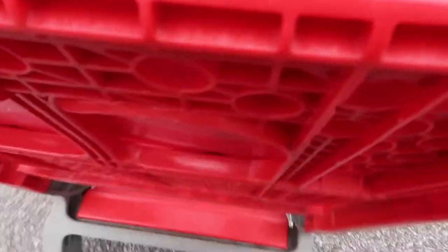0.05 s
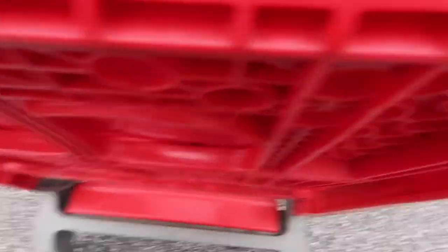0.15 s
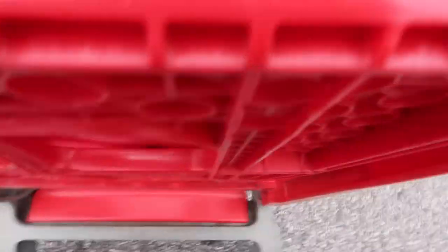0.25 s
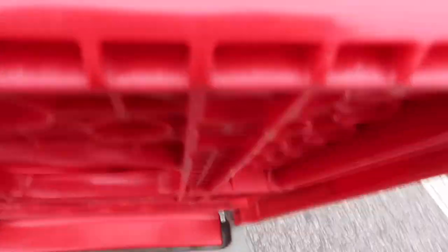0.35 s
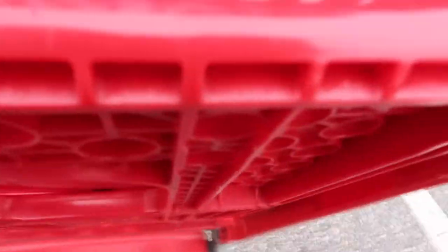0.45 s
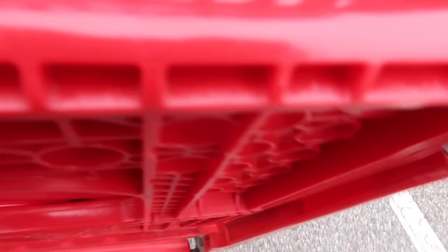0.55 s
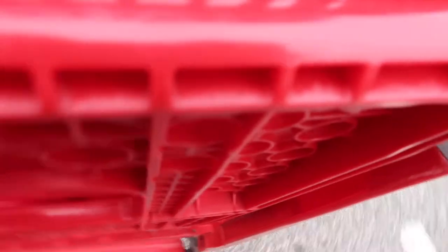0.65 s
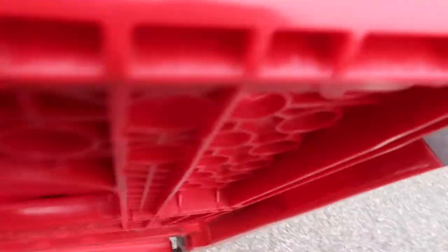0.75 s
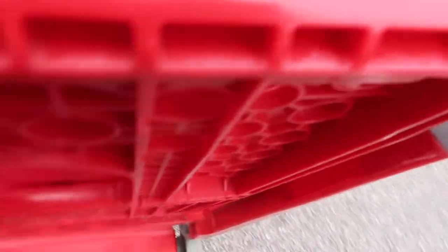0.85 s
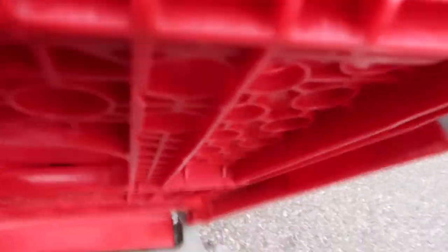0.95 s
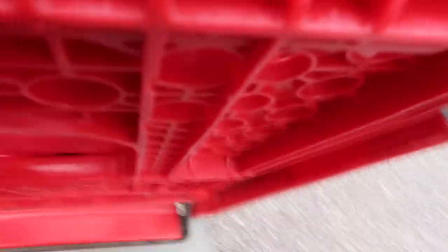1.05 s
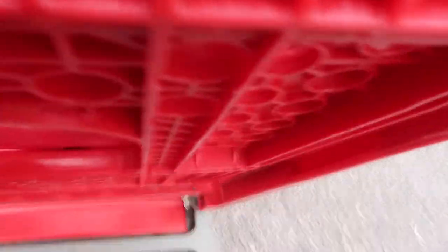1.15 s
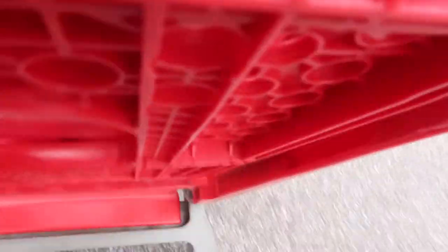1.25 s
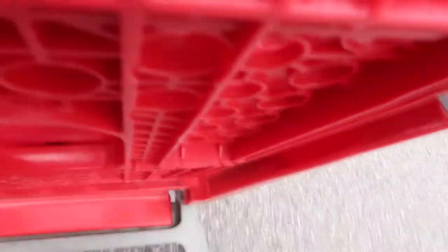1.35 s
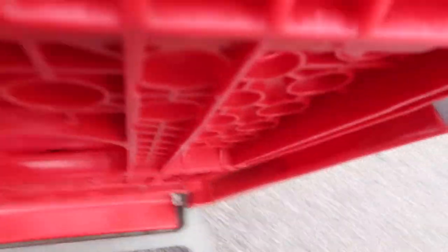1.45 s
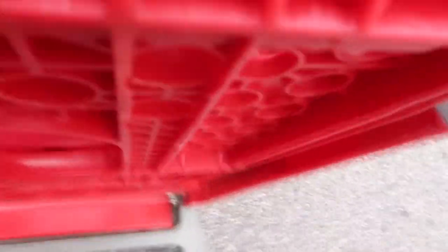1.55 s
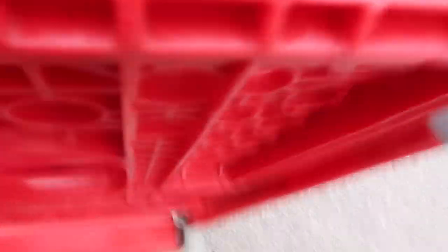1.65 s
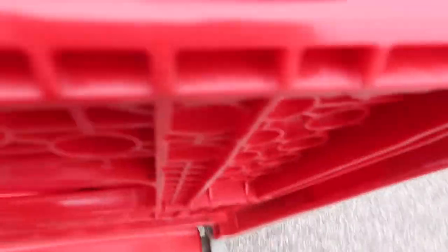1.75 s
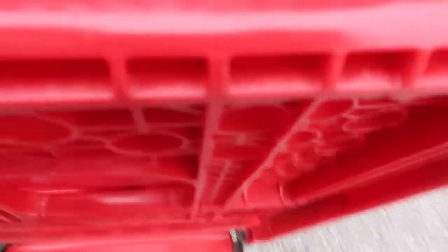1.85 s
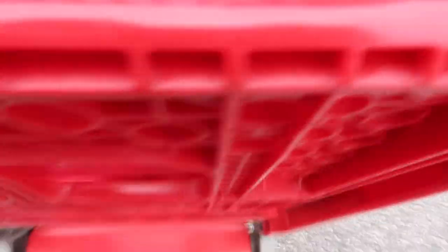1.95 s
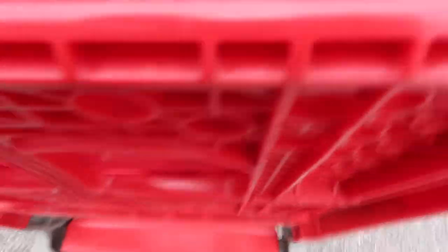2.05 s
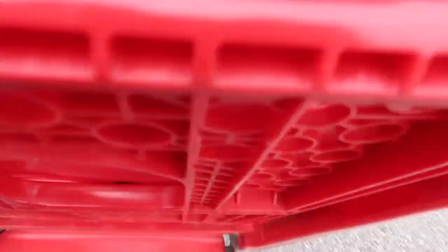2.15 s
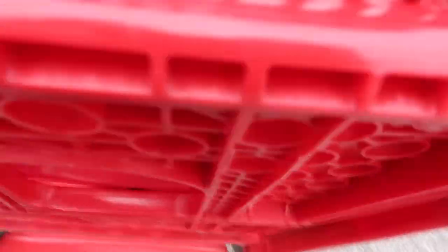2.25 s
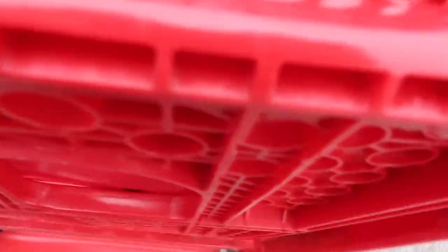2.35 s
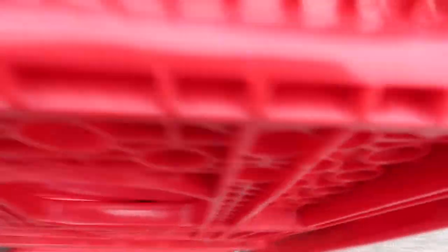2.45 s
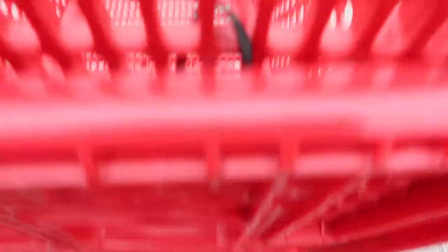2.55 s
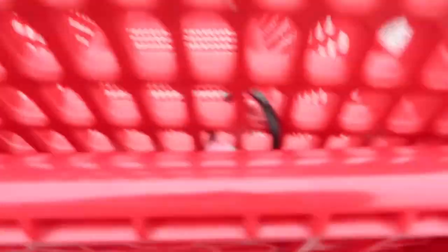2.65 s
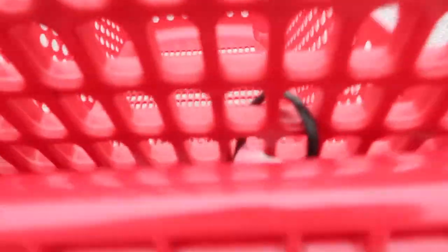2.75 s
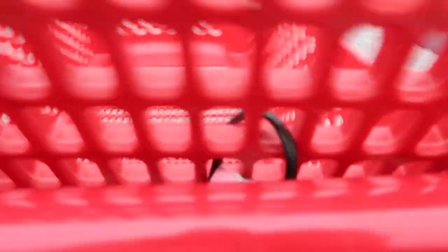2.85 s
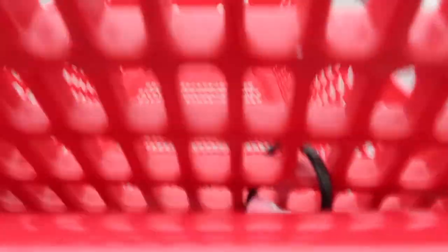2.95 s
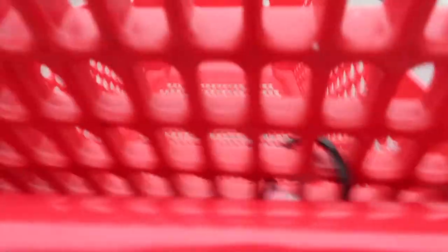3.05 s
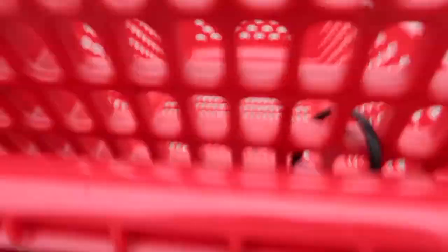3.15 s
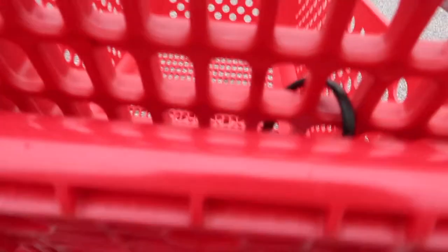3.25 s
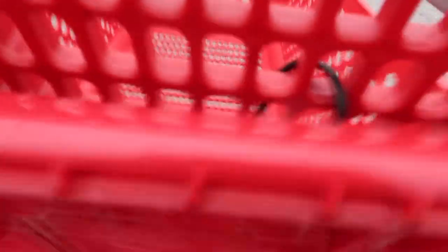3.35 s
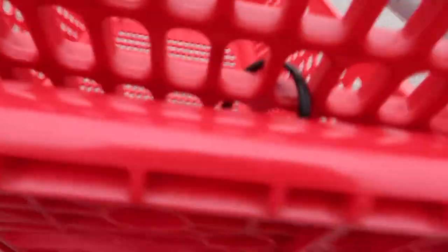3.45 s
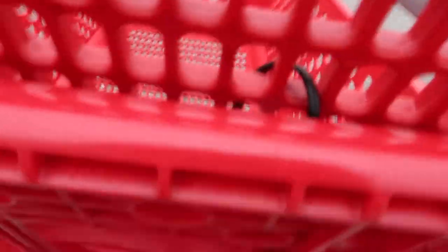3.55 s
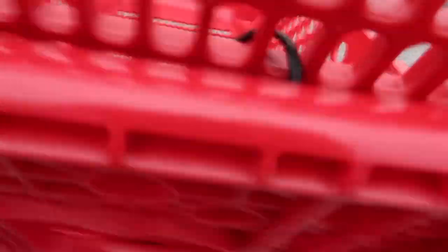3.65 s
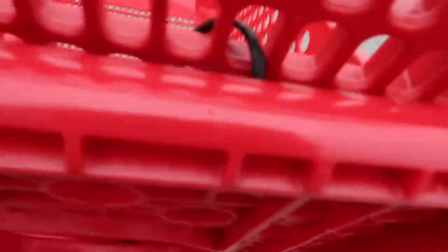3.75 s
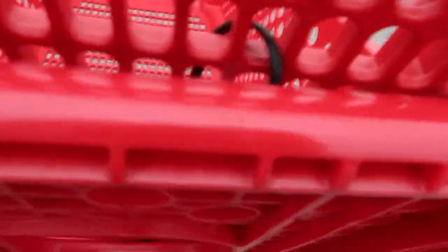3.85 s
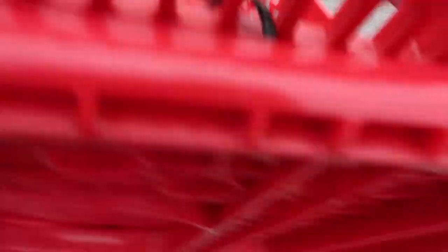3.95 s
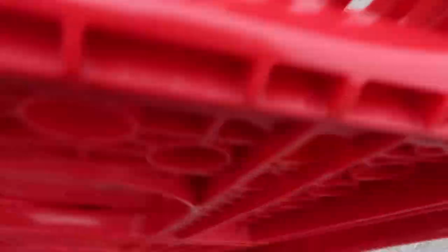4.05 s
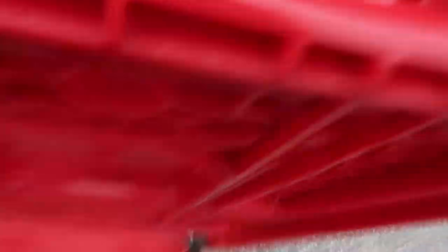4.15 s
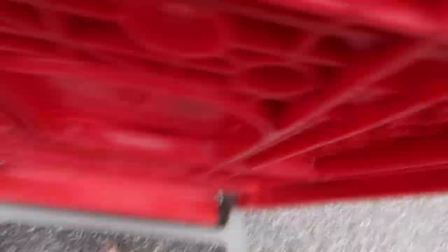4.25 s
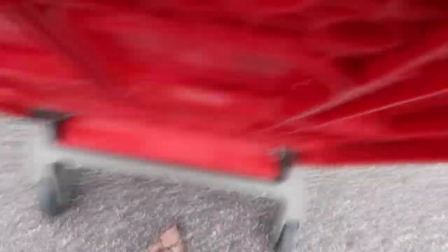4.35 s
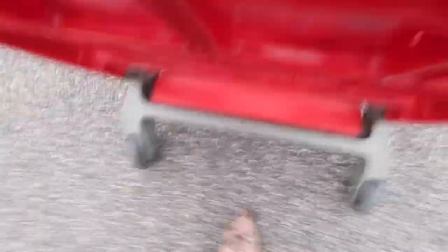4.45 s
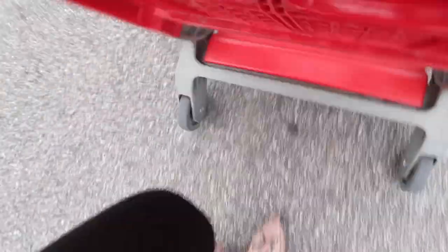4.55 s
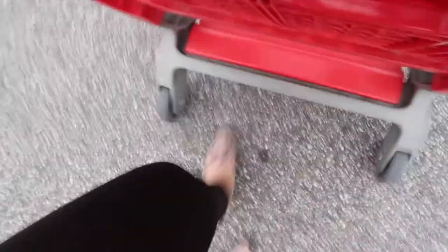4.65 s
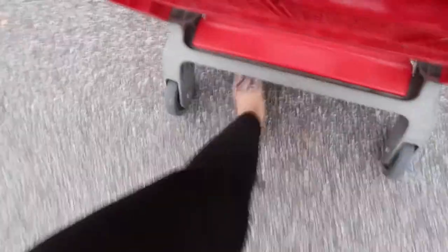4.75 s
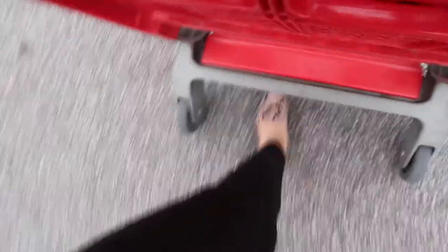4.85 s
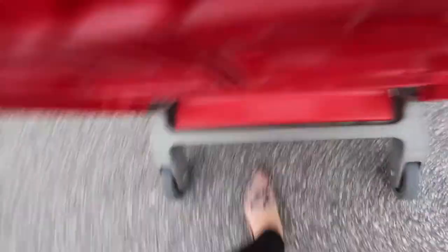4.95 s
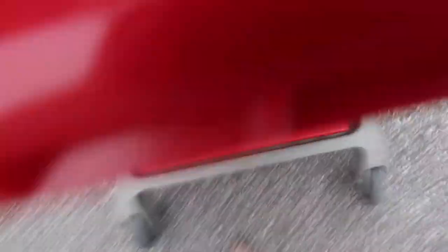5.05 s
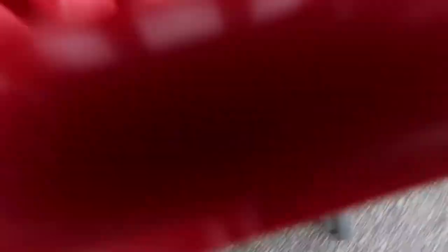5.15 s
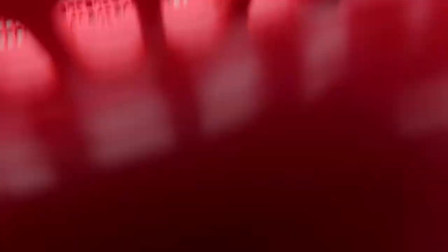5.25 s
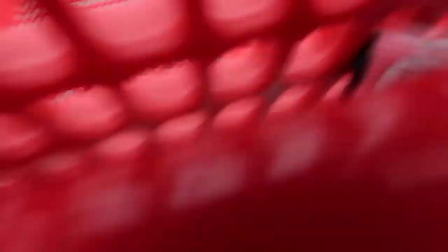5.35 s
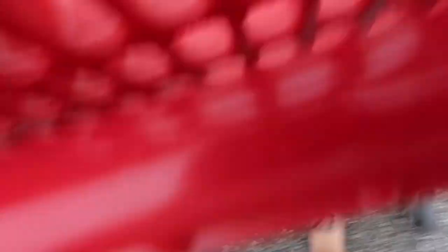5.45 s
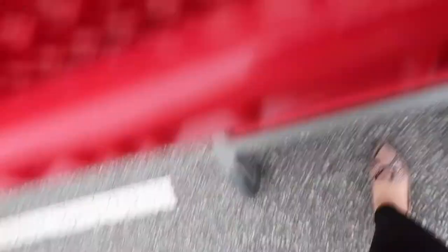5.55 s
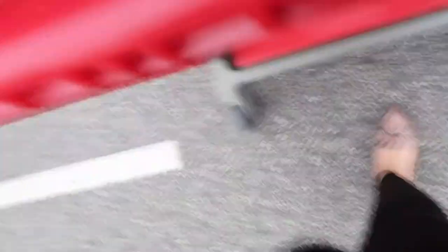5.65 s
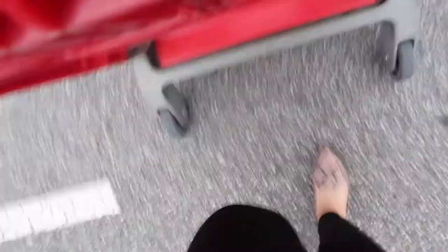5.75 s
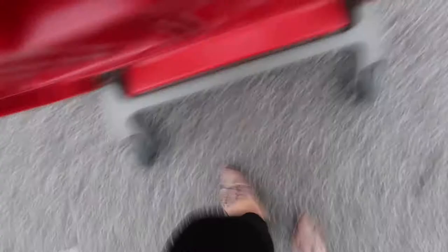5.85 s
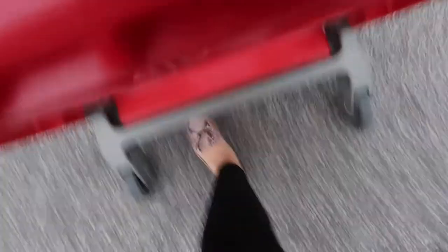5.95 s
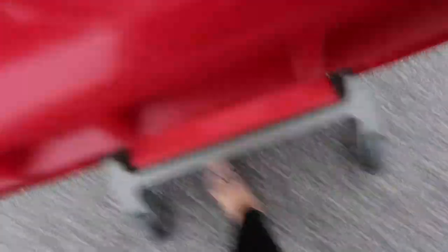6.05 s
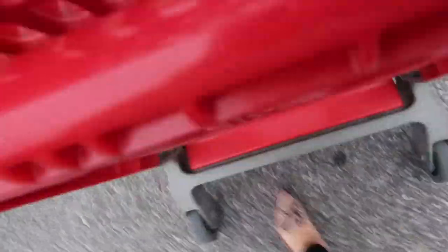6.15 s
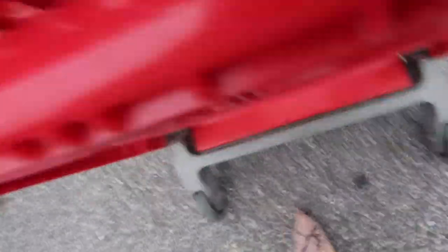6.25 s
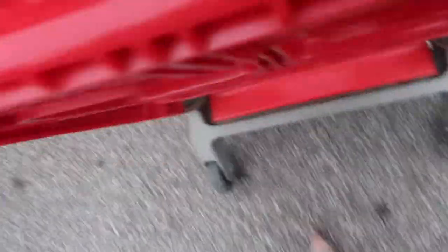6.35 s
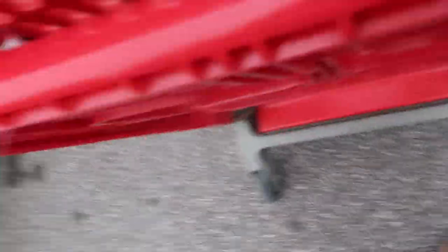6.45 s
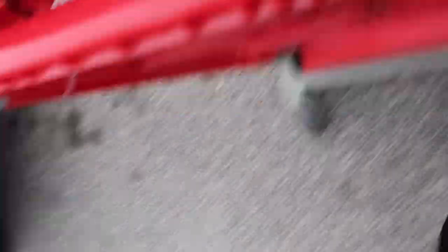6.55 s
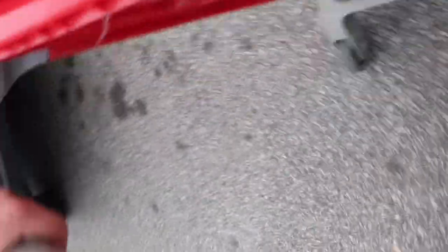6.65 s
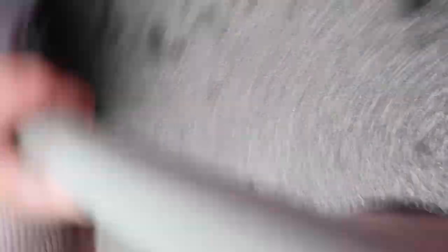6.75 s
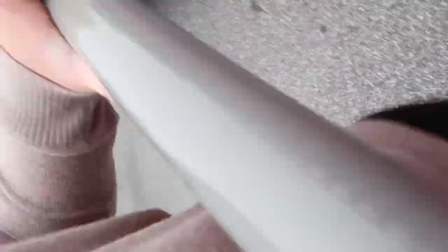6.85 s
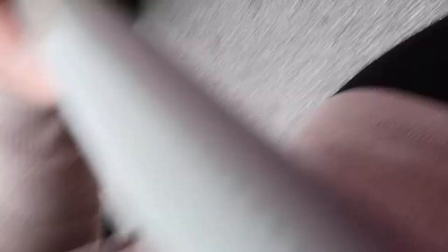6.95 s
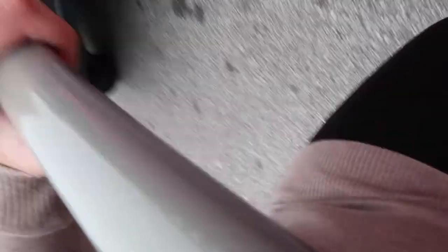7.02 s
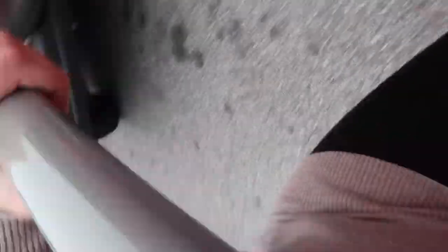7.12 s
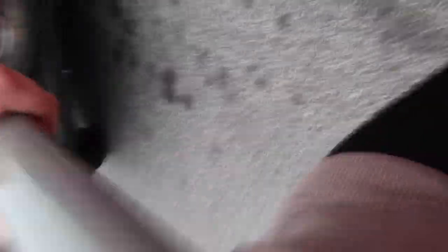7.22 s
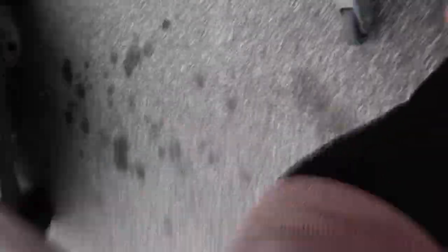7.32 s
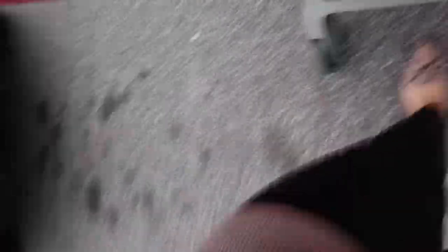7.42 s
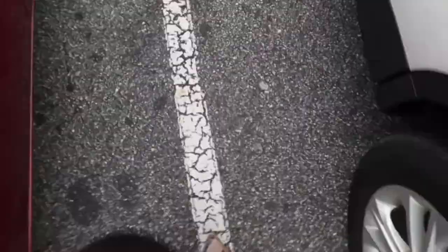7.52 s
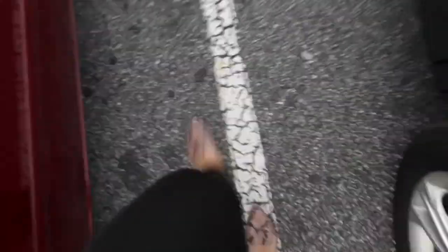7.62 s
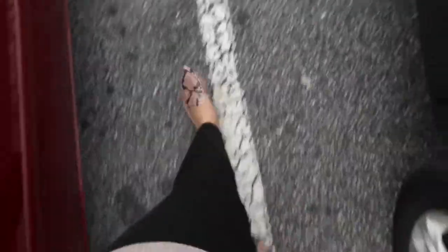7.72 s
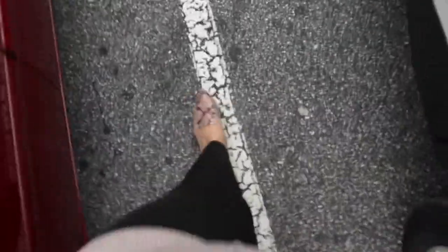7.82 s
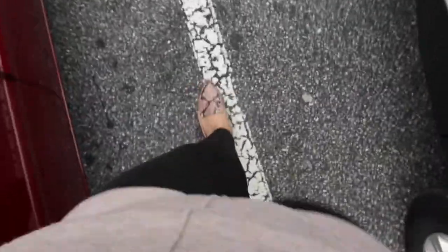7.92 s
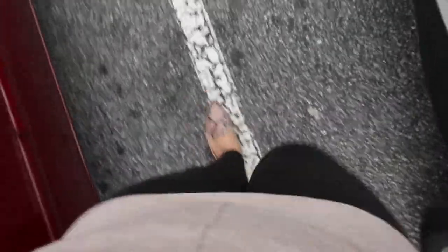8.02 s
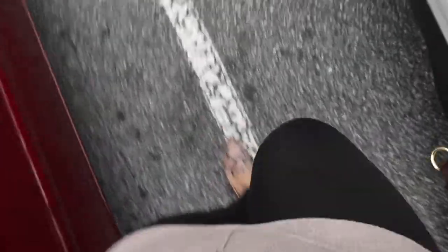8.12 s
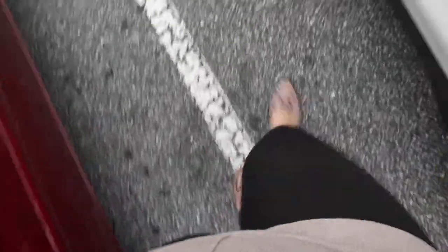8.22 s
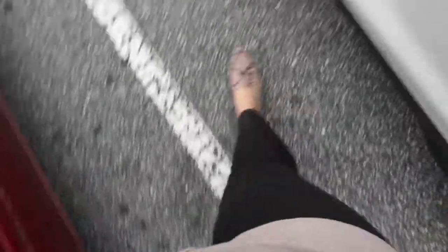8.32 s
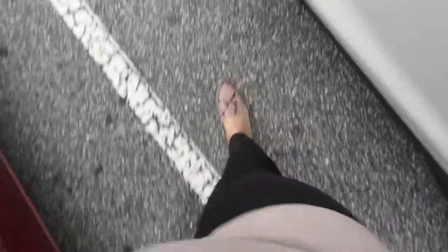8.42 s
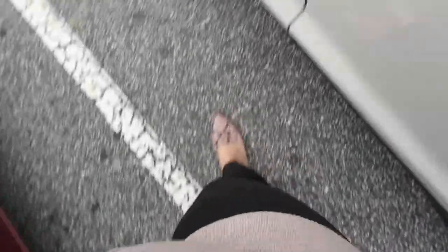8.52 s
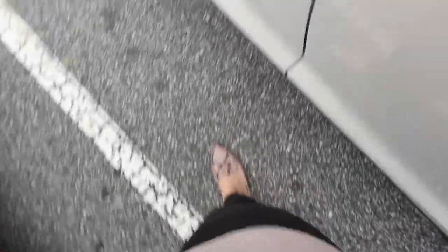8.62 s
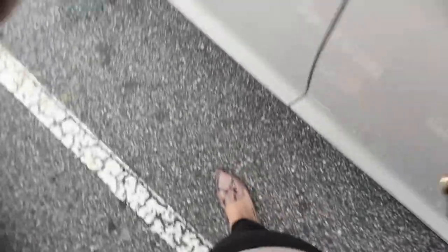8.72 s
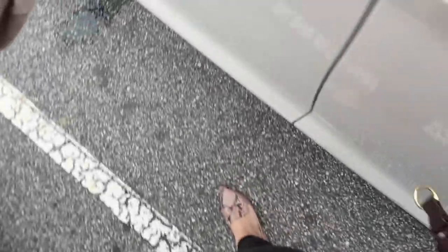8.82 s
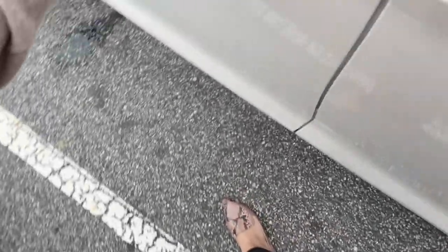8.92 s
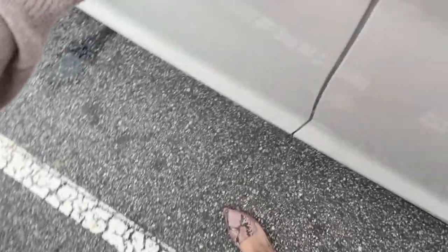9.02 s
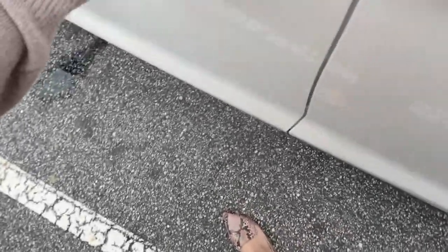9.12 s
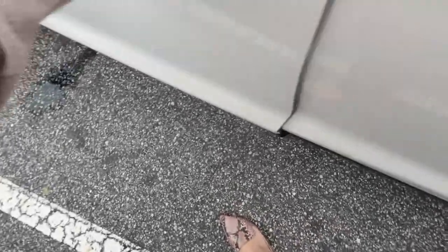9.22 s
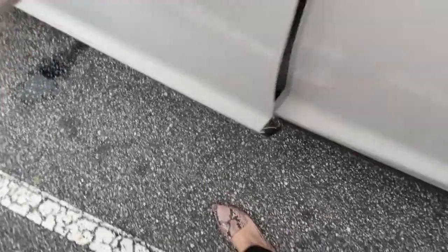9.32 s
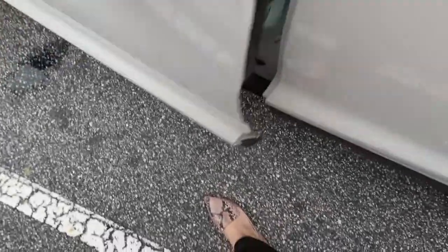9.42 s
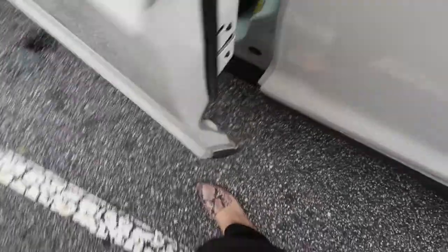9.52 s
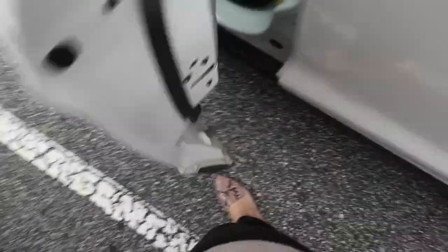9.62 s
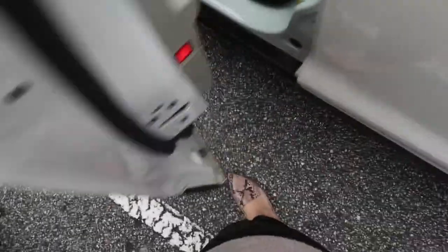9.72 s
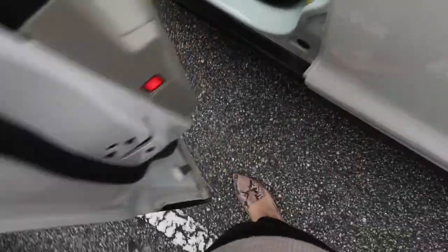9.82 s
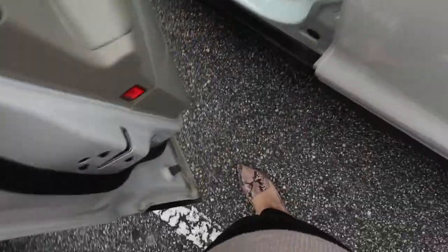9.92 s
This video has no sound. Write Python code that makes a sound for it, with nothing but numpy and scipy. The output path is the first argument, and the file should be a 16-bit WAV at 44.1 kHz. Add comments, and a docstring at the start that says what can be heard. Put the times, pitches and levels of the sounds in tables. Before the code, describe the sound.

A hollow plastic shopping cart clatters and rasps over rough asphalt, cuts off abruptly, then a hand thump, near silence, and a car door unlatching.

```python
"""A plastic shopping cart rolls over rough asphalt: grit, loose parts and hard knocks ring its basket as decaying
noise bands and panel tones, while the wheels rasp in dense tiny contacts under sparse treble noise bursts.
The cart's sound cuts off abruptly, just before a hand thumps the microphones with low pushes and a damped wobble.
The air of the lot, made of noise bands, drops to near silence, stays faint, then slowly rises; after three faint
ticks a car door is unlatched with ringing knocks, squeaks in falling harmonics and knocks against its stop."""
import sys
import numpy as np
from scipy import signal
from scipy.io import wavfile

SR = 44100
rng = np.random.default_rng(int(sys.argv[2]) if len(sys.argv) > 2 else 0)


def pcm_store(signal):
    """Save signal as 16-bit PCM."""
    levels = np.round(np.clip(np.atleast_2d(signal), -1, 1) * 32767)
    wavfile.write(sys.argv[1], SR, levels.astype(np.int16).T)


def elevation(decibels):
    """Turn decibel levels (scalar or array-like) into linear amplitude ratios."""
    levels = np.asarray(decibels, float)
    return 10 ** (levels / 20)


N = 440118
CART_ENDS_S = 7.522   # the cart's sound cuts off abruptly and the air drops

# Stereo width over pitch. Each row: frequency in Hz, gain in dB of the left-right difference against the sum.
SPREAD = [(60, -21), (110, -31.5), (200, -37.5), (380, -53.5), (700, -46), (1290, -40), (2380, -15.5),
          (4400, -2.5), (8120, 10.5), (15000, 10.5)]
# How hard the ground shakes the cart. Each row: time in seconds, shaking in dB.
SHAKING = [(0.0, -43.5), (0.19, -46.5), (0.67, -33.5), (1.09, -35.5), (1.84, -27), (2.13, -29),
           (3.15, -26.5), (3.41, -22.5), (4.32, -35), (4.53, -26.5), (5.3, -24.5), (5.54, -26.5),
           (6.83, -26), (7.35, -26.5), (7.42, -33.5), (7.5, -34.5)]


def rms_one(x):
    """Scale to unit rms."""
    return x / np.sqrt(np.mean(x ** 2) + 1e-20)


def in_time(rows):
    """Table columns as curves over all samples."""
    s, *columns = np.transpose(rows)
    return [np.interp(np.arange(N) / SR, s, c) for c in columns]


def at_hz(points, hz):
    """Read a table on a log-frequency axis."""
    point_hz, value = np.transpose(points)
    return np.interp(np.log(hz), np.log(point_hz + 1e-9), value)


def cut(x, hz, kind, order=2):
    """Butterworth filter."""
    return signal.sosfilt(signal.butter(order, np.clip(hz, 10, SR * .45), kind, fs=SR, output="sos"), x)


def drift(rate):
    """Slow chance of spread 1: noise through two equal poles at rate Hz, run at a fortieth of the sample rate."""
    r = np.exp(-80 * np.pi * rate / SR)
    slow = signal.lfilter([1], [1, -2 * r, r * r], rng.standard_normal(N // 40 + 2002))[2000:]
    return np.interp(np.arange(N) / 40, np.arange(len(slow)), rms_one(slow))


def left_right(mid, side):
    """Sum and difference to two channels."""
    return np.array([mid + side, mid - side])


def impulses(s, strength):
    """Single-sample clicks at the given seconds, over a floor that keeps filters out of denormals."""
    at = np.clip((s * SR).astype(int), 0, N - 1)
    return np.bincount(at, strength, N) + 1e-18


def random_signs(count):
    """Pushes and pulls by chance."""
    return rng.choice([-1, 1], count)


def gesture(rows, attack_s, release_s):
    """Level in dB: each row rises out of silence, glides from its first to its last level and dies."""
    t = np.arange(N) / SR
    levels = []
    for s, length, first_db, last_db in rows:
        corners = [-attack_s, 0, length, length + release_s]
        levels.append(np.interp(t - s, corners, [-100, first_db, last_db, -100]))
    return np.max(levels, axis=0)


def grains(per_s, spread_db, level_db):
    """Random events of uneven size under a level curve, until the cart's sound cuts off."""
    at = np.flatnonzero(rng.random(N) < per_s / SR)
    at = at[at < CART_ENDS_S * SR]
    return at / SR, level_db[at] + spread_db * np.minimum(rng.exponential(1, len(at)), 4)


def chattering(s, db, colour, gap_s, fade_db, count):
    """A knock is a light first touch, the main contact and quick rebounds of the same colour, each weaker."""
    chance = rng.exponential(1, (len(s), 2, count))
    turn = np.arange(count)   # 0 first touch, 1 main contact, then rebounds
    first, rebound = turn == 0, turn > 1
    times = s[:, None] + gap_s * (np.cumsum(chance[:, 0] * rebound, axis=1) - chance[:, 0] * first)
    fade = fade_db * np.cumsum((.5 + .5 * chance[:, 1]) * rebound, axis=1)
    levels = db[:, None] - fade - 10.0 * first
    return times.ravel(), levels.ravel(), *np.repeat(colour, count, axis=1)


def strike(spectrum, t60s, panels, s, db, low_db, high_db, favoured_hz, uneven_db):
    """Every blow wakes dense modes (third-octave noise that dies) and a few panels, each with a chance strength."""
    edges = 45 * 2 ** np.arange(0, 8.6, 1 / 3)
    white = rng.standard_normal((2, 2, N))   # two stereo noises serve alternate bands
    swell = np.exp(-1 / (0.00068 * SR))   # the dense modes take this long (s) to wake
    out = 0

    def blows(hz):
        octaves = np.log2(hz / 1500)
        dull = np.interp(octaves, [-1.6, -.6], [1, 0])
        bright = np.interp(octaves, [1.1, 2.0], [0, 1])
        near = np.exp(-(np.log2(hz / favoured_hz) / 0.5) ** 2)   # the spot struck favours one pitch region
        chance_db = uneven_db * (1 + bright) * rng.standard_normal(len(s))
        return elevation(db + dull * low_db + bright * high_db + 7.04 * near + chance_db)

    for k, (low, high) in enumerate(zip(edges, edges[1:])):
        hz = np.sqrt(low * high)
        t60 = at_hz(t60s, hz)
        power = signal.lfilter([1], [1, -elevation(-120 / (t60 * SR))], impulses(s, blows(hz) ** 2))
        power = signal.lfilter([1 - swell], [1, -swell], power)
        mid, side = cut(white[k % 2] * np.sqrt(power / t60), [low, high], "band")
        out = out + elevation(at_hz(spectrum, hz)) * left_right(mid, side * elevation(at_hz(SPREAD, hz)))
    for hz, level_db, t60 in panels:
        r, w = elevation(-60 / (t60 * SR)), 2 * np.pi * hz / SR
        clicks = impulses(s, blows(hz) * random_signs(len(s)))
        out = out + elevation(level_db) * signal.lfilter([0, np.sin(w)], [1, -2 * r * np.cos(w), r * r], clicks)
    return out


def air():
    """Distant traffic and wind: flickering half-octave noise bands that drop, stay faint and slowly rise."""
    # Tone of the lot. Each row: frequency in Hz, gain in dB.
    air_colour = [(18, -53.5), (48, -13.5), (170, -6), (210, -2.5), (364, -7), (569, -5), (1500, -12),
                  (16000, -53)]
    # steady at first, dropping to near silence, faint, then slowly rising
    steady_db, dropped_db, faint_db = -29, -81, -55.5
    faint_s, rise_s, rise_db_per_s = 7.75, 8.42, 10.5
    t = np.arange(N) / SR
    later_db = np.interp(t, [CART_ENDS_S, faint_s], [dropped_db, faint_db])
    later_db = later_db + rise_db_per_s * np.maximum(t - rise_s, 0)
    level_db = np.where(t < CART_ENDS_S, steady_db, later_db)
    edges = 30 * 2 ** np.arange(0, 9.6, .5)
    white = rng.standard_normal((2, 2, N))
    out = 0
    for k, (low, high) in enumerate(zip(edges, edges[1:])):
        mid, side = cut(white[k % 2], [low, high], "band")
        hz = np.sqrt(low * high)
        band_db = at_hz(air_colour, hz) + level_db + 1.2 * drift(7.4)
        out = out + elevation(band_db) * left_right(mid, side * elevation(at_hz(SPREAD, hz)))
    return out


def against_usual(band_db, db):
    """Colour of each knock: its band level against that of the usual knock."""
    return band_db - db - np.median(band_db - db)


def ticks_and_door_knocks():
    """Three faint ticks, then the door's handle, latch and stop: chattering blows into one set of modes."""
    # Three faint handling or footstep ticks, then the door's handle, latch and stop. Each row: start in seconds,
    # level in dB before the trim, low band in dB, high band in dB, favoured pitch in Hz.
    knock_rows = [(7.747, -56, -60.5, -83, 374), (7.933, -60, -74, -91, 1570), (8.532, -58, -64, -84, 818),
                  (8.974, -50, -67, -79, 461), (9.087, -36.5, -54, -73.5, 353),
                  (9.193, -31.5, -40, -72, 430), (9.227, -34, -34, -73, 300), (9.241, -35, -46.5, -77, 387),
                  (9.284, -48, -47, -68.5, 651), (9.835, -36, -45, -69, 1400),
                  (9.864, -15, -29.5, -50, 475), (9.884, -36, -35.5, -71, 331)]
    # Tone of the door. Each row: frequency in Hz, gain in dB.
    door_colour = [(35, -62), (60, -15), (220, 0), (629, -2.5), (721, -7), (948, -2.5), (1090, -6.5),
                   (6020, -32), (12200, -69), (14000, -94)]
    # Door panels that sing. Each row: frequency in Hz, gain in dB, decay by 60 dB in seconds.
    door_panels = [(240.6, -14, 0.11), (394, -9, 0.052), (771, -11.5, 0.055)]
    # Ring of the door's dense modes. Each row: frequency in Hz, decay by 60 dB in seconds.
    door_t60 = [(60, 0.15), (400, 0.1), (1500, 0.08), (5000, 0.042), (15000, 0.024)]
    s, db, low_db, high_db, hz = np.transpose(knock_rows)
    colour = [against_usual(low_db, db), against_usual(high_db, db), hz]
    blows = chattering(s, db - 5.0, colour, .0022, 5.8, count=4)
    ringing = cut(strike(door_colour, door_t60, door_panels, *blows, uneven_db=1.0), 117, "high")
    touch_s, touch_db, _, touch_high_db, _ = blows
    bare_contact = cut(impulses(touch_s, elevation(touch_db + touch_high_db)), [1200, 5000], "band")
    return ringing + bare_contact


def door():
    """Knocks ring; the seal rustles as noise; the hinge sticks and slips at a falling, unsteady rate."""
    # Hinge squeak: start in seconds, length in seconds, first envelope level in dB, last in dB.
    squeak_row = (9.635, .14, -72, -58)
    # Partials of the hinge. Each row: multiple of the slip rate, gain in dB before the tilt.
    hinge = [(1, -5), (3, 4), (4, -7), (6, -7), (9, -13)]
    # Rubber seal peeling off, then the door sweeping open. Each row: start in seconds, length in seconds,
    # first level in dB, last level in dB.
    seal_rows = [(9.24, .11, -77, -73), (9.63, 0.26, -74.5, -72.5)]
    attack_s, release_s = .04, .08
    knocks = ticks_and_door_knocks()
    rustle = rms_one(cut(rng.standard_normal((2, N)), [1500, 6000], "band", order=1))
    rustle = rustle * elevation(gesture(seal_rows, attack_s, release_s) + 1.8 * drift(60))
    age = np.clip(np.arange(N) / SR - squeak_row[0], 0, squeak_row[1] + release_s)
    slip_hz = 450 - 230 * age   # the slips slow down with the door
    tilt_db = 10 - 115 * age   # dB per octave: they lose their edge
    phase = 2 * np.pi * np.cumsum(slip_hz * (1 + 0.009 * drift(79.4))) / SR
    squeak = 0
    for k, partial_db in hinge:
        squeak = squeak + elevation(partial_db + tilt_db * np.log2(k / 3) + 2.5 * drift(32)) * np.sin(k * phase)
    squeak = squeak * elevation(gesture([squeak_row], attack_s, release_s))
    ajar = np.arange(N) > (seal_rows[0][0] - attack_s) * SR
    return knocks + ajar * (left_right(rustle[0], rustle[1] * elevation(-4.5)) + squeak)


def palm_push():
    """The palm rocks and wobbles on the ports: firm pressure drives them oppositely, the right one harder."""
    # A firm press, then a light rest. Each row: start in seconds, length in seconds, first and last
    # envelope level in dB.
    presses = [(7.584, 0.031, -7, -3), (7.66, 0.156, -52, -54)]
    level_db = gesture(presses, attack_s=0.012, release_s=0.006)
    rock_hz, rock_start_s, left_share = 31, 7.589, .4
    rock = np.sin(2 * np.pi * rock_hz * (np.arange(N) / SR - rock_start_s))
    wobble = cut(cut(rng.standard_normal((2, N)), [90, 260], "band"), 400, "low")
    wobble = np.tanh(1.5 * rms_one(wobble))
    opposed = np.clip((level_db + 63.5) / 15, 0, 1)    # only firm pressure pushes the ports apart
    ports = np.array([left_share * opposed - 1 + opposed, 0 * opposed - 1])
    motion = ports * (rock + elevation(-5.0) * wobble[0]) + elevation(-16.0) * wobble[1]
    return cut(elevation(level_db) * motion, 550, "low", order=4)


def palm_seal():
    """The seal of the palm tightens, lets go and wobbles while the freed skin flutters; the right port is later."""
    let_go_s, build_s, right_late_s = 7.6187, 0.0035, 0.00074
    wobble_hz, wobble_s = 110, 0.004
    flutter_hz, flutter_s = 310, .0085
    age = np.clip(np.arange(N) / SR - let_go_s, -.1, .1)
    wobble = 0.55 * np.exp(-age / wobble_s) * np.cos(2 * np.pi * wobble_hz * age)
    flutter = .5 * np.exp(-(age / flutter_s) ** 4) * np.cos(2 * np.pi * flutter_hz * age)
    seal = np.where(age < 0, -np.exp(age / build_s), wobble + flutter)
    left = cut(-.8 * seal, 580, "low", order=4)
    right = cut(np.roll(seal, int(right_late_s * SR)), 730, "low", order=3)
    return elevation(3) * np.array([left, right])


def hand():
    """The palm pushes on the ports, the skin slips once as a filtered click and the seal lets go."""
    # Skin slipping. Each row: time in seconds, level in dB before boost and filters.
    slip_rows = [(7.606, -14)]
    push = palm_push()
    s, db = np.transpose(slip_rows)
    slips = cut(cut(impulses(s, elevation(db + 14.5)), [250, 1100], "band", order=1), 2470, "low")
    return push + slips * [[-.9], [1.6]] + palm_seal()


def taps():
    """Taps on the housing: a very short bright ring, stronger in the difference, and a low thud."""
    # Sharp taps on the microphone housing. Each row: time in seconds, then snap, ring and thud in dB
    # before their trims.
    tap_rows = [(1.1152, -41, -55, -51), (1.493, -37, -36, -51), (5.195, -23, -17, -26),
                (5.3237, -42.5, -21, -31.5), (5.402, -47, -25.5, -37), (5.4347, -47, -25, -36.5),
                (5.497, -31, -16.5, -28.5), (7.354, -22.5, -14.5, -42.5)]
    s, db, ring_db, thud_db = np.transpose(tap_rows)
    age = np.arange(400) / SR
    noise = rng.standard_normal((2, N))
    snap = np.convolve(impulses(s, elevation(db)), np.exp(-age / .0016))[:N] * noise
    # the cavity behind the ports rings; the difference is a quarter cycle off the sum
    swell = age / 0.00032 * np.exp(1 - age / 0.00037)
    clicks = impulses(s, elevation(ring_db + 12.0))
    phase = 2 * np.pi * 4300 * age
    ring = [np.convolve(clicks, swell * wave(phase))[:N] for wave in (np.sin, np.cos)]
    tick = ring + cut(snap, [6000, 15000], "band") * elevation(8.5)
    thud = cut(impulses(s, elevation(thud_db + 49.5)), [130, 600], "band", order=1)
    return left_right(tick[0] * elevation(-6.0) + thud, tick[1])


def treble_bursts():
    """Sparse, wide treble noise bursts at random times, each dying quickly."""
    # Level of these bursts over time. Each row: time in seconds, gain in dB.
    burst_level = [(1.4, -7), (2.2, 6), (3.2, -0.5), (5.0, -3), (6.0, 5.5)]
    level_db = in_time(SHAKING)[0] + in_time(burst_level)[0] - 25.5
    s, db = grains(16, 9.0, level_db)   # 16 per second
    burst = signal.lfilter([1], [1, -elevation(-60 / (0.0069 * SR))], impulses(s, elevation(db)))
    mid, side = cut(burst * rng.standard_normal((2, N)), [5000, 13000], "band")
    return left_right(mid, side * elevation(6.5))


def rasp():
    """Hard wheels on coarse stones: very dense tiny contacts, bright and wide, filling the gaps between knocks."""
    contacts_per_s, against_mean_db, follows = 2900, -19.5, .8   # follows: share of the shaking's swing
    shaking_db, = in_time(SHAKING)
    mean_db = shaking_db.mean()
    level_db = mean_db + against_mean_db + follows * (shaking_db - mean_db) + 7.5 * drift(5.2)
    touch = (rng.random((2, N)) < contacts_per_s / SR) * rng.standard_normal((2, N))
    touch = touch * elevation(3.6 * rng.exponential(1, (2, N)))
    mid, side = rms_one(cut(cut(touch, [1800, 5200], "band", order=1), 4600, "low")) * elevation(level_db)
    return left_right(mid, cut(side, 3500, "high") * elevation(-1.5))


def pings(s, db, hz):
    """Each hard knock starts with a short ring at the pitch of the spot struck."""
    ping_db, cycles = -5, 21   # cycles until the ring is 60 dB down
    out, age = np.zeros(N + 1000), np.arange(1000) / SR
    for at, level_db, f in zip((s * SR).astype(int), db, hz):
        out[at:at + len(age)] += elevation(level_db + ping_db - 60 * age * f / cycles) * np.sin(2 * np.pi * f * age)
    return out[:N]


def rolling(knock_s, knock_db):
    """Grit under the wheels and loose parts: random contacts that follow the shaking and the jolts of knocks."""
    shaking_db, = in_time(SHAKING)
    # a hard knock leaves the cart shaking
    jolt_t60_s, jolt_threshold_db = 0.23, -8.5
    shock = impulses(knock_s, elevation(knock_db - jolt_threshold_db))
    jolt_db = 20 * np.log10(1 + signal.lfilter([1], [1, -elevation(-60 / (jolt_t60_s * SR))], shock))
    # the microphones swing close to the rumbling frame: from, nearest and away in seconds
    near_db = np.interp(np.arange(N) / SR, (3.7, 5.5, 6.1), [0, 4.5, 0])
    # grit takes on shares of the shaking's swing and of the jolt
    grit_level_db = 0.92 * (shaking_db - shaking_db.mean()) - 68 + 0.78 * jolt_db
    grit_s, grit_db = grains(900, 5.88, grit_level_db + near_db + 0.81 * drift(13))
    # the rate of the loose parts drifts, so they clump
    loose_s, loose_db = grains(190 * elevation(3.5 * drift(30)), 3.02, shaking_db - 11.5 + 0.78 * jolt_db)
    # grit is dull: carried up through the frame
    grit_hz = 400 * 2 ** rng.normal(0, 0.85, len(grit_s))
    grit = grit_s, grit_db, 0 * grit_s + 14.2, 0 * grit_s - 1.5, grit_hz
    loose_high_db = rng.normal(-3.1, 4.1, len(loose_s))
    loose_hz = 1600 * 2 ** rng.normal(0, 0.52, len(loose_s))
    loose = loose_s, loose_db, 0 * loose_s - 8.0, loose_high_db, loose_hz
    return grit, loose


def cart():
    """Grit under the wheels, loose parts, bumps and hard knocks all ring the same basket."""
    # The hardest basket knocks. Each row: start in seconds, level in dB before each layer's trim,
    # treble in dB against that level, favoured pitch in Hz.
    knock_rows = [(0.211, -21, -30, 2060), (0.28, -19.5, -25.5, 2260), (0.338, -23.5, -32, 2040),
                  (0.389, -20.5, -59, 960), (0.493, -12.5, -33, 955), (0.611, -9.5, -33, 1460),
                  (0.679, -14, -39, 1960), (0.812, -14, -62, 1380), (0.9, -5.5, -58, 1420),
                  (1.048, -15, -48, 730), (1.191, -16.5, -41, 1360), (1.32, -10.5, -31, 2090),
                  (1.365, -10.5, -33, 1960), (1.437, -14.5, -33, 2100), (1.594, -14, -30.5, 2050),
                  (1.602, -5.5, -31, 2144), (1.647, -6.5, -25.5, 2100), (1.703, -4, -36.5, 1450),
                  (1.771, -5, -23, 2194), (1.827, -7.5, -24.5, 1220), (1.923, -11, -17, 2037),
                  (1.978, -12, -23, 2060), (1.985, -6.5, -21.5, 2060), (2.101, -5.5, -25.5, 2080),
                  (2.178, -10, -21.5, 1580), (2.326, -3.5, -23.5, 2020), (2.359, -13, -25, 2050),
                  (2.414, -11, -32, 1520), (2.542, -4, -24, 2060), (2.588, -4.5, -27, 1995),
                  (2.655, -7, -36, 2030), (2.685, -11, -17, 1450), (2.735, -5.5, -20, 2027),
                  (2.813, -10.5, -22.5, 1808), (2.966, -6.5, -33, 1400), (3.039, -6, -31.5, 1440),
                  (3.205, -1.5, -31.5, 1816), (3.269, -5.5, -35.5, 1371), (3.347, -6, -36, 1390),
                  (3.448, -3.5, -30, 2002), (3.505, -2, -34.5, 1893), (3.584, -11, -22.5, 1246),
                  (3.679, -10, -30.5, 894), (3.853, -12.5, -19, 2025), (4.005, -11.5, -26.5, 2050),
                  (4.033, -9.5, -22.5, 1655), (4.088, -3, -38, 3450), (4.191, -8, -31, 2024),
                  (4.243, -9, -30.5, 2155), (4.295, -10.5, -30.5, 1955), (4.334, -9.5, -22.5, 1830),
                  (4.422, -11, -26.5, 1496), (4.504, -6, -31, 2045), (4.532, -5.5, -17.5, 2036),
                  (4.547, -2.5, -30.5, 2030), (4.566, -4.5, -31, 1414), (4.655, -7, -34.5, 1166),
                  (4.788, -12.5, -22, 1962), (4.839, -4, -28.5, 1460), (5.041, -6, -31.5, 1483),
                  (5.067, -3.5, -21, 2060), (5.094, -6, -31.5, 937), (5.182, -6, -23, 2210),
                  (5.277, -14, -28, 1450), (5.453, -14, -25, 1450), (5.461, -4.5, -23, 1450),
                  (5.728, -4, -20, 1990), (5.912, -9, -22.5, 1390), (5.983, -5, -27, 1536),
                  (6.165, -5, -27.5, 1470), (6.314, -11.5, -26.5, 1016), (6.367, -7.5, -26, 2965),
                  (6.525, -4, -24, 1492), (6.618, -12.5, -32, 1770), (6.679, -6.5, -18, 2060),
                  (6.735, -10.5, -35, 2470), (6.838, -3.5, -31.5, 2430), (6.948, -7, -20.5, 975),
                  (7.009, -9, -21.5, 2270), (7.098, -22, -12.5, 1830), (7.274, -10.5, -39.5, 2180),
                  (7.45, -4, -32, 1970), (7.503, -11.5, -38.5, 900)]
    # Loose parts of the basket clack, lighter and drier than the knocks. Each row: start in seconds,
    # level in dB before each layer's trim.
    clack_rows = [(0.1, -25.5), (0.452, -23), (0.77, -14), (0.831, -16), (0.873, -18.5), (0.911, -18.5),
                  (1.24, -16), (1.337, -13.5), (1.54, -14), (1.751, -9), (1.858, -9.5), (2.166, -13.5),
                  (2.209, -9.5), (2.373, -14), (2.564, -6.5), (2.7, -7.5), (2.714, -6.5), (3.129, -15),
                  (3.176, -9.5), (3.367, -12), (3.428, -11.5), (3.467, -11), (3.518, -6.5), (3.565, -6),
                  (3.6, -10), (3.612, -16.5), (3.711, -17.5), (3.739, -9), (3.766, -13), (3.783, -11),
                  (3.828, -15), (3.928, -12.5), (3.943, -10.5), (3.98, -10.5), (4.078, -14), (4.103, -11.5),
                  (4.119, -5.5), (4.14, -13), (4.354, -10), (4.47, -10.5), (4.483, -8), (4.589, -15),
                  (4.611, -12.5), (4.632, -10.5), (4.662, -11.5), (4.713, -13), (4.806, -8.5), (4.85, -7),
                  (4.957, -17.5), (5.009, -12), (5.222, -15), (5.25, -12.5), (5.366, -14.5), (5.567, -17.5),
                  (5.697, -10), (5.74, -3.5), (5.783, -12), (5.935, -15.5), (6.009, -13), (6.042, -14.5),
                  (6.074, -8), (6.11, -12), (6.135, -8.5), (6.268, -15), (6.33, -7.5), (6.395, -12),
                  (6.417, -8), (6.438, -11.5), (6.496, -6.5), (6.553, -6), (6.565, -10.5), (6.66, -11.5),
                  (6.693, -10.5), (6.786, -8.5), (6.825, -8), (6.886, -11.5), (6.902, -6), (6.923, -11.5),
                  (6.973, -4.5), (7.18, -12), (7.247, -11), (7.303, -11.5), (7.34, -16.0)]
    # A wheel drops over a crack and thumps the frame. Each row: start in seconds, level in dB before the trim.
    bump_rows = [(0.603, -20.5), (1.333, -19.5), (3.107, -21.5), (3.271, -19), (4.555, -23.5), (5.06, -17),
                 (5.186, -13), (5.72, -10.5)]
    # Tone of the basket. Each row: frequency in Hz, gain in dB.
    basket = [(24, -60), (40, -40.5), (312, -3.5), (363, -8.5), (422, -1), (467, -5.5), (615, 0),
              (1410, -3.5), (2000, -3), (3470, -4.5), (8990, -46.5), (11800, -41.5), (16000, -61.5)]
    # Basket panels that stand out. Each row: frequency in Hz, gain in dB, decay by 60 dB in seconds.
    basket_panels = [(373.5, -13, 0.12), (471.2, -14.5, 0.17), (493.6, -15, 0.13), (897, -5, 0.035),
                     (1390, -11.5, 0.04), (1450, -7, 0.034), (1995, -10, 0.063), (2060, -9.5, 0.035)]
    # Ring of the basket's dense modes. Each row: frequency in Hz, decay by 60 dB in seconds.
    basket_t60 = [(60, 0.32), (400, 0.16), (1500, 0.05), (5000, 0.034), (15000, 0.029)]

    s, db, treble_db, hz = np.transpose(knock_rows)
    grit, loose = rolling(s, db)
    colour = [0 * s + 0.1, treble_db - np.median(treble_db), hz]
    knocks = chattering(s, db - 13.5, colour, .0022, 6.5, count=4)
    clack_s, clack_db = np.transpose(clack_rows)
    chance = rng.standard_normal((len(clack_s), 2))
    clack_hz = 2400 * 2 ** (0.58 * chance[:, 1])
    colour = [0 * clack_s - 6.0, 5.0 * chance[:, 0] - 2.5, clack_hz]
    clacks = chattering(clack_s, clack_db - 12.5, colour, 0.002, 9.0, count=3)
    bump_s, bump_db = np.transpose(bump_rows)
    # a bump stirs the upper modes 11 dB less, its lows are lifted back
    bumps = bump_s, bump_db - 11, 0 * bump_s + 15.0, 0 * bump_s, 0 * bump_s + 230.2
    blows = [np.concatenate(c) for c in zip(grit, loose, knocks, clacks, bumps)]
    ringing = strike(basket, basket_t60, basket_panels, *blows, uneven_db=3.0)
    # the bare contact of each knock and clack, before the basket rings
    contact_s, contact_db = np.append(s, clack_s), np.append(db, clack_db) - 3
    contact = impulses(contact_s, elevation(contact_db) * random_signs(len(contact_s)))
    contact = cut(contact, [1200, 3800], "band")
    return cut(ringing + pings(s, db, hz) + contact, 72, "high", order=3)


def scene():
    """The cart until its sound cuts off abruptly, then the hand, the lot and the door."""
    # The cart drifts from the right to the left of the microphones: left-right balance in dB, first and last.
    lean_ends_db = (-2.13, 1.05)
    t = np.arange(N) / SR
    cutoff_db = np.interp(t - CART_ENDS_S, [0, .002, .018, .03], [-1, -54, -45, -89])
    lean_db = np.interp(t, [0, CART_ENDS_S], lean_ends_db)
    rolling_cart = cart() + rasp() + treble_bursts() + taps()
    return rolling_cart * elevation(cutoff_db + lean_db * [[.5], [-.5]]) + hand() + air() + door()


def band_limit(x):
    """A steep low-pass at the top of the band."""
    return signal.sosfilt(signal.butter(12, 16510, fs=SR, output="sos"), x)


def record(dry):
    """The microphones pass no steady pressure and the converter overloads at full scale."""
    mix = np.clip(cut(dry, 25, "high"), -1, 1)
    return band_limit(mix)


dry = scene()
out = record(dry)
pcm_store(out)
```